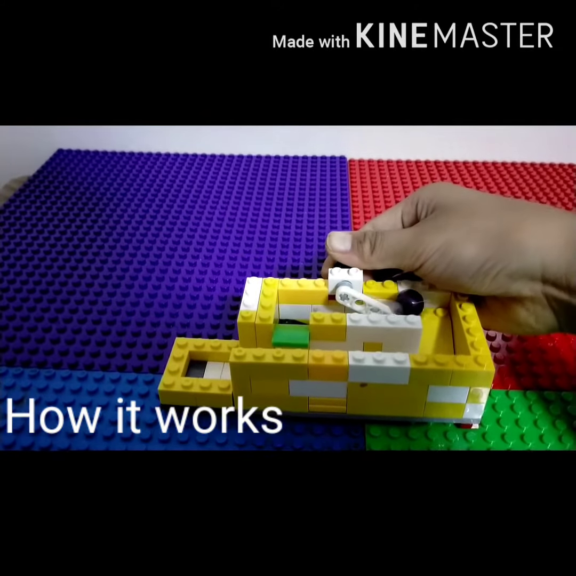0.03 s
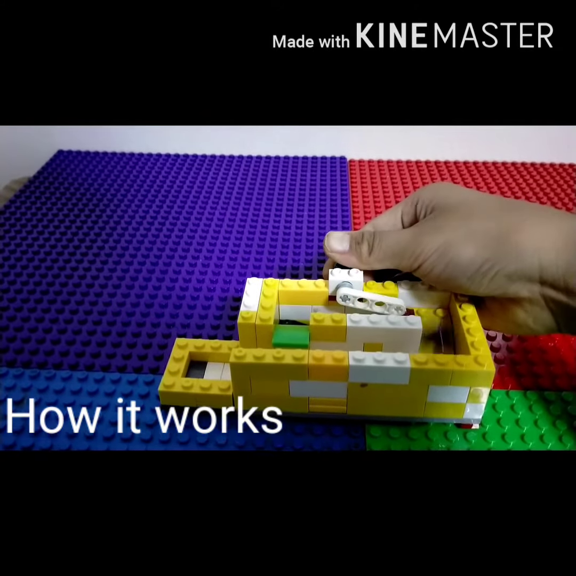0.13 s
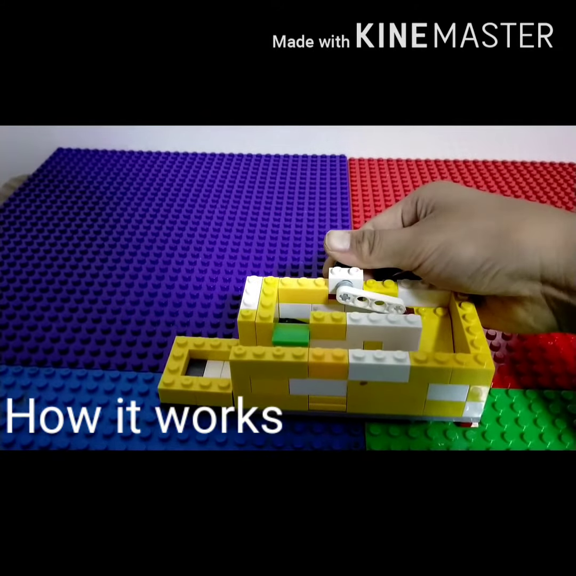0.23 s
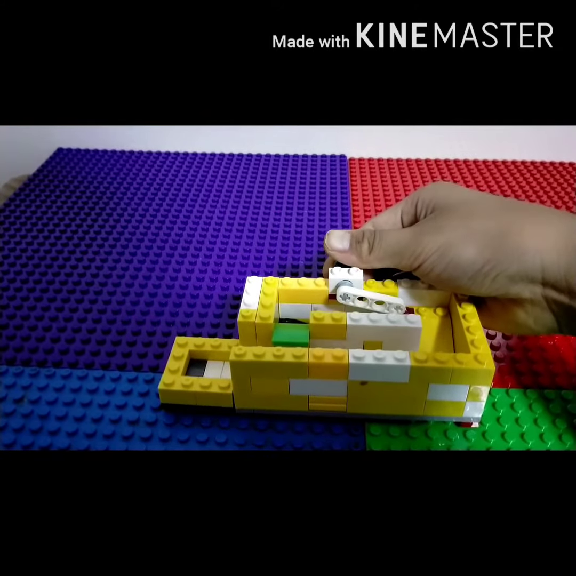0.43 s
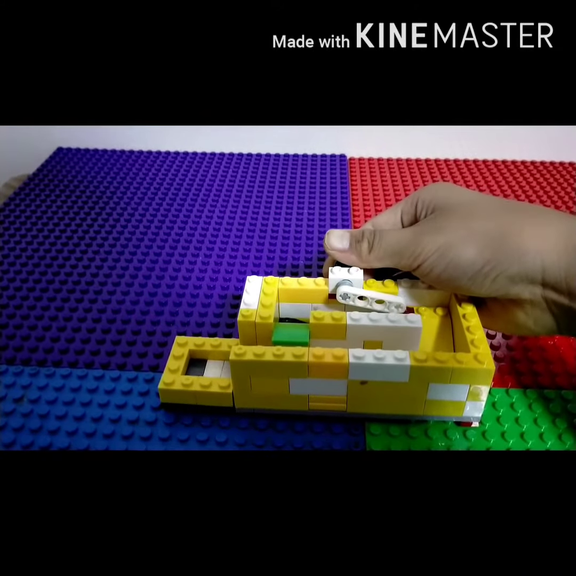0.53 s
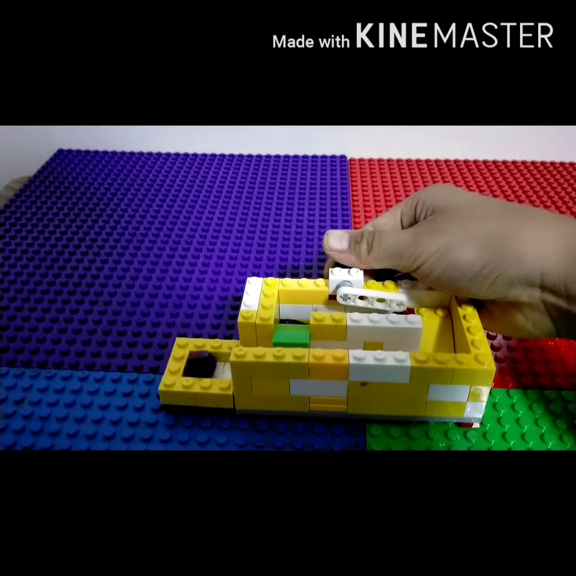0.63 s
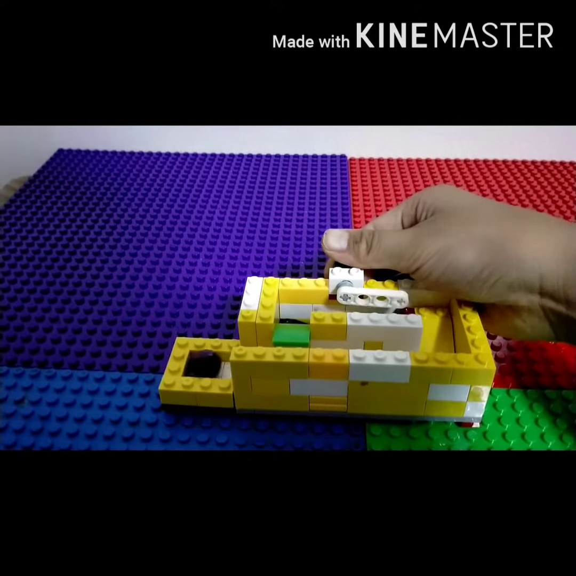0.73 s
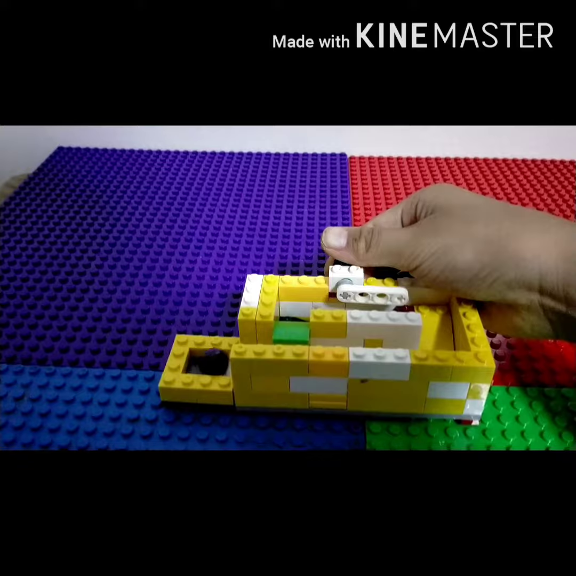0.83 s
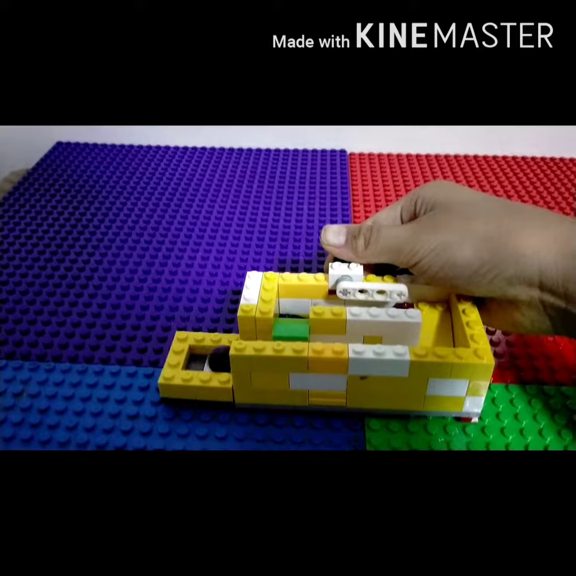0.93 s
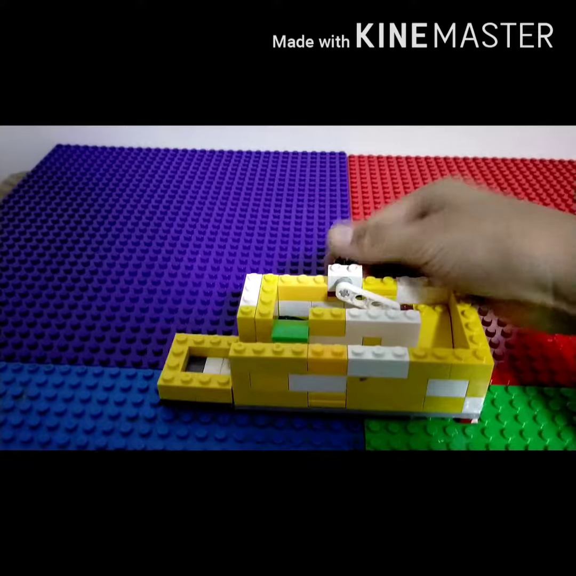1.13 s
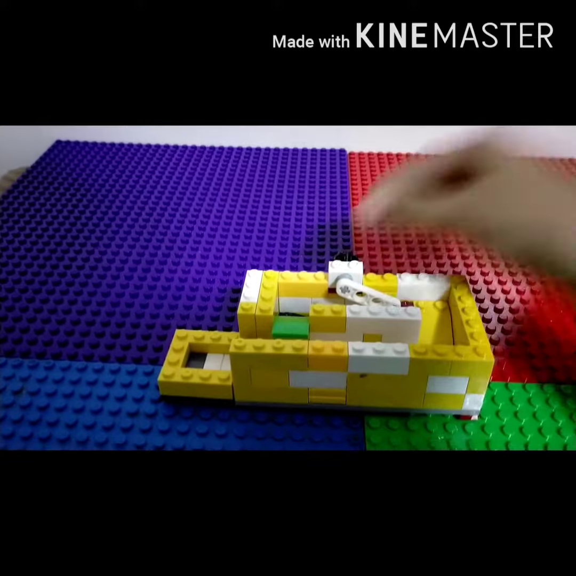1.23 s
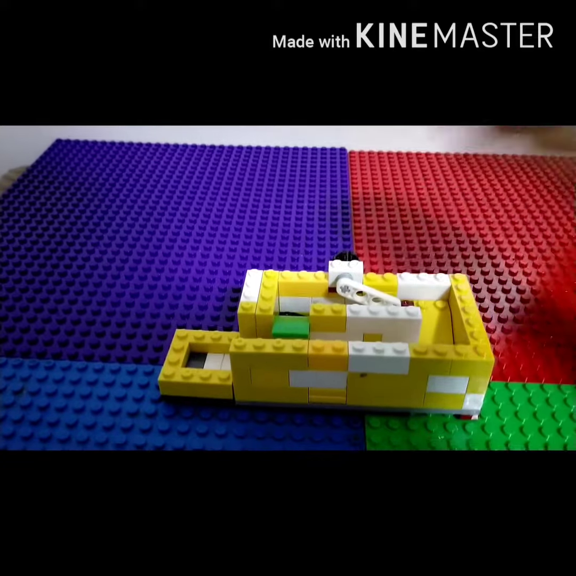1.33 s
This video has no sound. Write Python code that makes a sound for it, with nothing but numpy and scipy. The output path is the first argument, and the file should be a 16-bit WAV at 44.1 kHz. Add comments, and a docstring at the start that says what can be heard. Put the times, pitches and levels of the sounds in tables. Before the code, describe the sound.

Small ball clattering down a plastic toy brick chute into a tray, then a lever clicks.

```python
"""A small room, a toy of plastic bricks on a table. A small hard ball drops in, clacks from wall to
wall, rolls down a chute over the brick seams and lands in a tray. Each knock is a contact tick plus
ringing plastic modes; rolling is a stream of tiny contacts. The base bumps the table twice as the hand
lets go, and a lever clicks back. Behind it: room echo, air, faint hum, low handling rumble."""
import sys
import numpy as np
from scipy import signal
from scipy.fft import rfft, irfft
from scipy.io import wavfile

SR = 44100
rng = np.random.default_rng(int(sys.argv[2]) if len(sys.argv) > 2 else 0)


def materialize(psi):
    """Save the field psi as 16-bit PCM at rate SR to the path in sys.argv[1].

    A 1-D psi becomes a single channel; in a 2-D psi each row is a channel.
    """
    bounded = np.clip(np.atleast_2d(psi).T, -1, 1)
    quanta = np.round(bounded * 32767).astype(np.int16)
    wavfile.write(sys.argv[1], SR, quanta)


N = 61739

# room air spectrum (frequency [Hz], density [dB])
AIR_SPECTRUM = [(20, -7), (80, -17), (240, -16.5), (310, -27.5), (450, -22), (750, -26.5), (1700, -27),
                (2800, -31), (4200, -44), (6500, -46.5), (8700, -41), (11000, -47), (16000, -42.5)]
AIR_DB, HUM_HZ, HUM_DB = -65.5, 240, -72.5
# handling rumble envelope (time [s], level [dB])
RUMBLE_ENVELOPE = [(0, -81), (.2, -61.5), (.5, -60.5), (.8, -60.5), (1.1, -62.5), (1.25, -56.5), (1.4, -61)]
# handling rumble spectrum (frequency [Hz], density [dB])
RUMBLE_SPECTRUM = [(1, -4), (10, -3), (25, -16), (45, -13), (90, -23.5), (250, -34), (2000, -64)]
# room decay (frequency [Hz], t60 [s])
ROOM_DECAY = [(200, 0.7), (2500, 0.41), (15000, 0.44)]
# room echo strength (frequency [Hz], gain [dB])
ROOM_GAIN = [(200, -9), (1000, -7.5), (2000, -13), (3300, -11.5), (5500, -13), (8700, -12.5), (13000, -19)]
PREDELAY_S, LOWPASS_HZ = 0.008, 15700

# base on table (time [s], thud [dB], tail [dB], rise [s], tail t60 [s])
BASE_BUMPS = [(.813, -49.5, -52, 0.0027, 0.48), (1.069, -49, -56.5, 0.0043, 0.49)]
# table modes (frequency [Hz], level [dB], t60 [s])
TABLE_MODES = [(111, -16, 0.18), (210, -10, 0.35), (253.8, -3.5, 0.17), (415.7, -4.5, 0.15),
               (512.6, -4, 0.18), (847, -1, 0.04), (1665, -11, 0.1)]
# soft noisy tail with faint high hiss after each thud (frequency [Hz], density [dB])
THUD_TAIL_SPECTRUM = [(60, -1.5), (200, -0.5), (550, -1), (1200, -8.5), (1750, -5), (3500, -13.5),
                      (6500, -22), (8600, -14.5), (11000, -24), (16000, -18)]
# lever modes (frequency [Hz], level [dB], t60 [s])
LEVER_MODES = [(1444, -5, 0.037), (1700, -1.5, 0.026), (2320, -4.5, 0.045), (2710, -10, 0.022),
               (3130, -2, 0.023), (3480, -2, 0.024), (3780, -4, 0.019), (4580, -0.5, 0.023),
               (4800, -2.5, 0.015)]
LEVER_S, LEVER_DB, LEVER_TICK_DB, LEVER_CLATTER_DB = 1.1962, -47, -60.5, -1.5

# rolling envelope (time [s], level [dB])
ROLL_ENVELOPE = [(.21, -92), (.25, -60), (.33, -63.5), (.41, -66), (.46, -67.5), (.58, -69), (.66, -63),
                 (.75, -69.5), (.8, -76), (1.0, -81)]
# rolling contact spectrum (frequency [Hz], density [dB])
ROLL_SPECTRUM = [(100, -27), (400, 7.5), (800, 1), (1050, 11.5), (2500, 4.5), (3600, -3.5), (5500, -11),
                 (16000, -26)]
# chute modes (frequency [Hz], level [dB], t60 [s])
CHUTE_MODES = [(1088, -11, 0.069), (1934, -6, 0.044), (2415, 5.5, 0.059), (3130, -6, 0.12),
               (4450, -25, 0.066)]
GRAINS_PER_S, GRAIN_SPREAD_DB, CHUTE_DB = 1200, 1.5, -3

# ball on tray (time [s], ring [dB], tick [dB])
TRAY_HITS = [(0.7592, -41.5, -37.5), (0.7676, -56.5, -56), (0.7726, -52.5, -67)]
# tray modes (frequency [Hz], level [dB], t60 [s])
TRAY_MODES = [(1022, -1, 0.037), (1252, -7.5, 0.097), (1640, -8, 0.064), (1970, -1.5, 0.037),
              (2378, 0.5, 0.036), (3090, -8.5, 0.037), (4070, 6, 0.018), (5050, -13, .03),
              (8830, -2.5, 0.015)]
# dense fast tray modes (frequency [Hz], density [dB])
TRAY_SPECTRUM = [(150, -9), (700, 0), (1050, -12), (2400, -4), (3300, -14), (4200, 3.5), (5600, -14),
                 (16000, -37)]
TRAY_CLATTER_DB = -5

# loose piece snapping (time [s], level [dB])
PIECE_SNAPS = [(0.226, -66), (0.3535, -21.5)]
# dense modes of the loose piece (frequency [Hz], density [dB])
SNAP_SPECTRUM = [(100, -48), (5500, -34), (7800, -10.5), (8500, 2), (9400, 2), (10200, -9), (11800, -5.5),
                 (12600, -3), (13600, 0.5), (14500, -17), (16000, -16)]
# fine rattle after a snap (frequency [Hz], density [dB])
RATTLE_SPECTRUM = [(300, -42), (4000, -20), (6500, -10), (8600, -9), (10000, -5.5), (15000, -4),
                   (16000, -1)]
RATTLE_DB = -27

# ball on walls (time [s], ring [dB], tilt at pivot [dB/oct], tick [dB])
WALL_HITS = [(0.1758, -48, -4, -60), (0.2094, -32, -7, -36.5), (0.2263, -30, 0, -36), (.2515, -44, 5, -53),
             (.2560, -38, 14.5, -50), (0.265, -46.5, 26, -74), (0.2864, -32.5, 3.5, -43.5),
             (0.306, -41, 13, -46), (0.3093, -28, 0, -33), (.3225, -52, 6, -54), (.3460, -34.5, 5, -40),
             (0.3542, -31.5, 3.5, -39), (0.3697, -36, 3.5, -62), (.4045, -43, 2, -58),
             (0.418, -49, -7, -54), (0.468, -59, 0, -68), (0.478, -51.5, -1, -72),
             (0.5223, -47.5, 4, -58.5), (0.614, -49, -11, -62.5), (.6430, -50.5, -3, -63.5),
             (0.7015, -60, 3, -63), (.7185, -55, -3, -64), (0.7524, -54, -13, -57)]
# brick wall modes (frequency [Hz], level [dB], t60 [s])
WALL_MODES = [(935, -23, 0.044), (1546, -11, .035), (1870, -4.5, 0.029), (2172, -14.5, 0.064),
              (2570, -13.5, 0.052), (2832, -10.5, 0.034), (3274, -5, 0.028), (3464, -1.5, 0.016),
              (3870, -11, 0.016), (4316, -12, 0.024), (4700, -6, 0.012)]
# dense fast wall modes (frequency [Hz], density [dB])
WALL_SPECTRUM = [(150, -42), (700, -15.5), (1200, -6), (1750, -1.5), (2600, -0.5), (3400, 1.5),
                 (4000, -4.5), (4800, -7.5), (5600, -16.5), (16000, -38)]
WALL_CLATTER_DB, WALL_CLATTER_T60_S, WALL_CLATTER_RISE_S = -1.5, 0.023, 0.00096
# ball-plastic contact (frequency [Hz], density [dB])
TICK_SPECTRUM = [(100, -38), (600, -18), (2000, 0), (4500, -6.5), (5400, -4), (6500, -1), (9200, -2.5),
                 (10400, -4.5), (12500, -6), (16000, -10)]
BRICK_RISE_S, PIVOT_HZ, TILT_WIDTH_OCT = 0.001, 2800, 0.51


def amp(db):
    """dB to gain."""
    return 10 ** (np.asarray(db) / 20)


def unit(x):
    """Scale to rms 1."""
    return x / np.sqrt(np.mean(x ** 2) + 1e-20)


def read(points, hz):
    """Table lookup over log frequency."""
    points_hz, values = np.transpose(points)
    return np.interp(np.log(hz + 1), np.log(points_hz + 1), values)


def envelope(points):
    """Scene-long gain from (time [s], level [dB])."""
    return amp(np.interp(np.arange(N) / SR, *np.transpose(points)))


def add(mix, start_s, sound):
    """Mix in at start_s."""
    part = mix[round(start_s * SR):][:len(sound)]
    part += sound[:len(part)]


def tilt_db(hz, tilt_db_oct):
    """Positive tilt brightens a knock, negative tilt dulls it; the slope levels off."""
    return tilt_db_oct * TILT_WIDTH_OCT * np.tanh(np.log2((hz + 1) / PIVOT_HZ) / TILT_WIDTH_OCT)


def coloured(x, spectrum, tilt_db_oct=0):
    """Filter by a tilted spectrum; rms 1."""
    hz = np.fft.rfftfreq(len(x), 1 / SR)
    gain = amp(read(spectrum, hz) + tilt_db(hz, tilt_db_oct))
    return unit(irfft(rfft(x) * gain, len(x)))


def burst(spectrum, t60_s, rise_s, tilt_db_oct=0):
    """Many close modes swell and die together, as shaped noise."""
    t = np.arange(SR // 2) / SR
    noise = coloured(rng.standard_normal(len(t)), spectrum, tilt_db_oct)
    return noise * (1 - np.exp(-t / rise_s)) * np.exp(-np.log(1000) * t / t60_s)


def ring(modes, rise_s, tilt_db_oct=0, detune=0.012, scatter_db=1.5):
    """Decaying modes; each blow hits another spot, shifting pitch and strength slightly."""
    t = np.arange(SR // 2) / SR
    out = np.zeros(len(t))
    for k, (hz, db, t60_s) in enumerate(modes):
        shift, spot = rng.standard_normal(2)
        wave = np.sin(2 * np.pi * hz * (1 + detune * shift) * t)
        gain = amp(db + tilt_db(hz, tilt_db_oct) + scatter_db * spot)
        out += (-1) ** k * gain * np.exp(-np.log(1000) * t / t60_s) * wave
    return out * (1 - np.exp(-t / rise_s))


def background():
    """Room air, faint hum, handling rumble."""
    air = amp(AIR_DB) * coloured(rng.standard_normal(N), AIR_SPECTRUM)
    hum = amp(HUM_DB) * np.sin(2 * np.pi * HUM_HZ * np.arange(N) / SR)
    rumble = envelope(RUMBLE_ENVELOPE) * coloured(rng.standard_normal(N), RUMBLE_SPECTRUM)
    return air + hum + rumble


def room(x):
    """Diffuse tail; treble dies faster than bass."""
    hz, t, noise = signal.stft(rng.standard_normal(SR), SR, nperseg=256)
    t60_s = read(ROOM_DECAY, hz)[:, None]
    decay = np.exp(-np.log(1000) * t / t60_s)
    energy_norm = np.sqrt(2 * np.log(1000) / (t60_s * SR))
    tail = noise * decay * energy_norm * amp(read(ROOM_GAIN, hz))[:, None]
    response = np.zeros(SR)
    add(response, PREDELAY_S, signal.istft(tail, SR, nperseg=256)[1])
    return signal.fftconvolve(x, response)[:N]


def base_bumps():
    """The base thuds on the table; each thud has a soft noisy tail with faint high hiss."""
    out = np.zeros(N)
    for start_s, thud_db, tail_db, rise_s, t60_s in BASE_BUMPS:
        thud = amp(thud_db) * ring(TABLE_MODES, rise_s)
        tail = amp(tail_db) * burst(THUD_TAIL_SPECTRUM, t60_s, rise_s)
        add(out, start_s, thud + tail)
    return out


def tick():
    """Sharp contact on plastic."""
    return burst(TICK_SPECTRUM, t60_s=0.017, rise_s=0.0001)


def lever_click():
    """The released lever hits its stop and jars the walls."""
    out = np.zeros(N)
    modes = ring(LEVER_MODES, rise_s=0.0005)
    clatter = burst(WALL_SPECTRUM, WALL_CLATTER_T60_S, WALL_CLATTER_RISE_S, tilt_db_oct=-2)
    body = modes + amp(LEVER_CLATTER_DB) * clatter
    add(out, LEVER_S, amp(LEVER_DB) * body + amp(LEVER_TICK_DB) * tick())
    return out


def rolling():
    """Tiny contacts of the rolling ball excite the chute."""
    contacts = rng.random(N) < GRAINS_PER_S / SR
    grains = contacts * rng.standard_normal(N)
    grains *= amp(GRAIN_SPREAD_DB * np.minimum(rng.exponential(1, N), 3))
    chute = unit(signal.fftconvolve(grains, ring(CHUTE_MODES, BRICK_RISE_S))[:N])
    return (coloured(grains, ROLL_SPECTRUM) + amp(CHUTE_DB) * chute) * envelope(ROLL_ENVELOPE)


def tray_landing():
    """The ball strikes the tray, rings it and settles."""
    out = np.zeros(N)
    for start_s, ring_db, tick_db in TRAY_HITS:
        modes = ring(TRAY_MODES, rise_s=0.00045)
        clatter = amp(TRAY_CLATTER_DB) * burst(TRAY_SPECTRUM, t60_s=0.038, rise_s=0.00049)
        add(out, start_s, amp(ring_db) * (modes + clatter) + amp(tick_db) * tick())
    return out


def loose_piece():
    """A loose piece snaps at two hard knocks and rattles on."""
    out = np.zeros(N)
    for start_s, db in PIECE_SNAPS:
        rattle = amp(RATTLE_DB) * burst(RATTLE_SPECTRUM, t60_s=0.28, rise_s=0.0073)
        snap = burst(SNAP_SPECTRUM, t60_s=0.014, rise_s=0.00045)
        add(out, start_s, amp(db) * (snap + rattle))
    return out


def wall_clacks():
    """Each knock of the ball ticks and rings the brick walls."""
    out = np.zeros(N)
    for start_s, ring_db, tilt_db_oct, tick_db in WALL_HITS:
        modes = ring(WALL_MODES, BRICK_RISE_S, tilt_db_oct)
        clatter = burst(WALL_SPECTRUM, WALL_CLATTER_T60_S, WALL_CLATTER_RISE_S, tilt_db_oct)
        body = modes + amp(WALL_CLATTER_DB) * clatter
        add(out, start_s, amp(ring_db) * body + amp(tick_db) * tick())
    return out


def scene():
    """Toy, room echo and background; mono."""
    toy = wall_clacks() + loose_piece() + tray_landing() + lever_click() + rolling() + base_bumps()
    return (toy + room(toy) + background())[None]


def record(dry):
    """Low-pass band limit."""
    lowpass = signal.firwin(255, LOWPASS_HZ, window=("kaiser", 8), fs=SR)
    return signal.oaconvolve(dry, lowpass[None], "same")


dry = scene()
out = record(dry)
materialize(out)
```